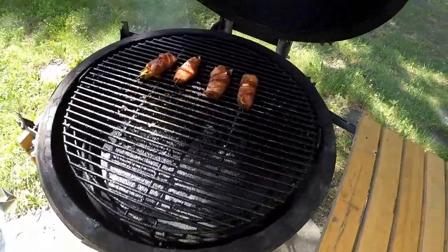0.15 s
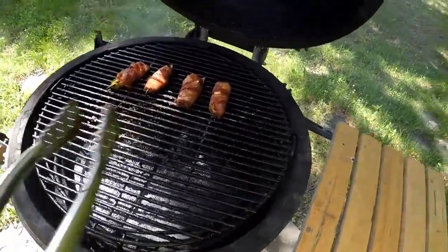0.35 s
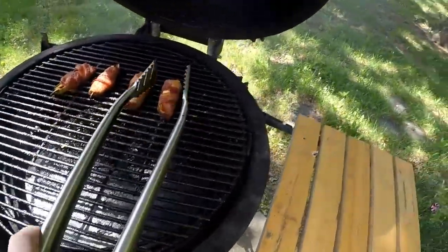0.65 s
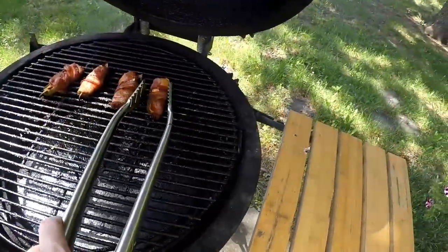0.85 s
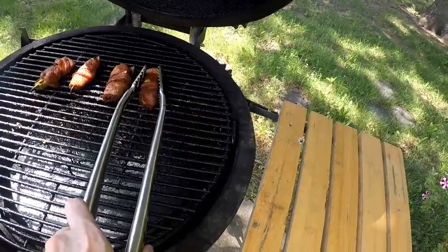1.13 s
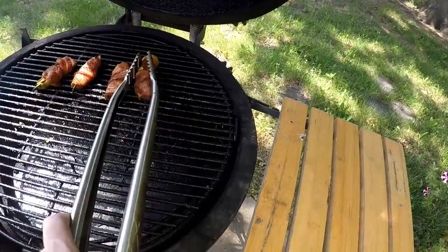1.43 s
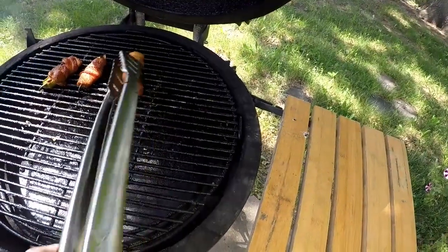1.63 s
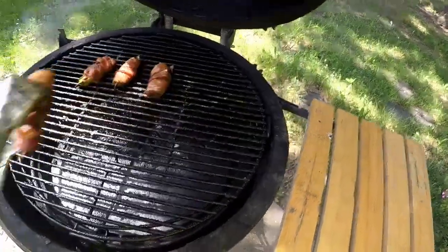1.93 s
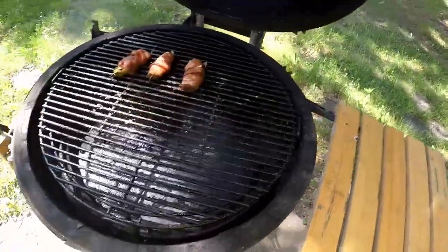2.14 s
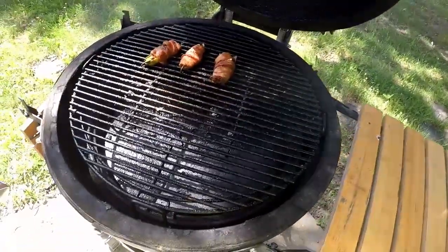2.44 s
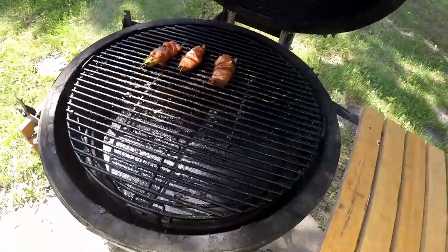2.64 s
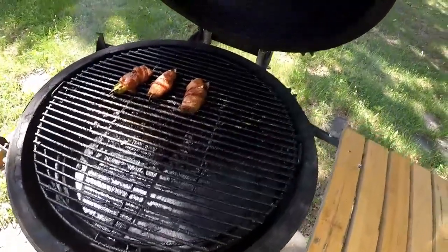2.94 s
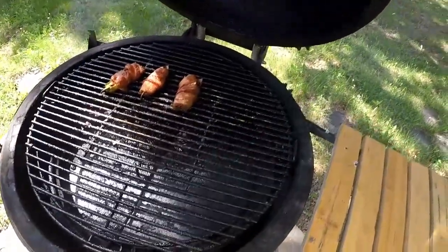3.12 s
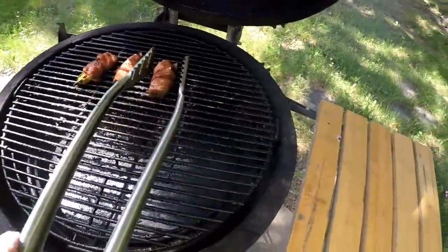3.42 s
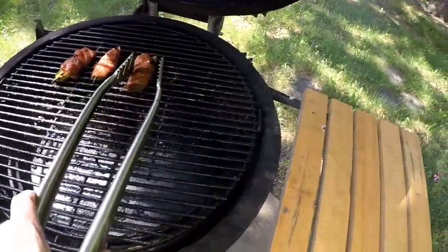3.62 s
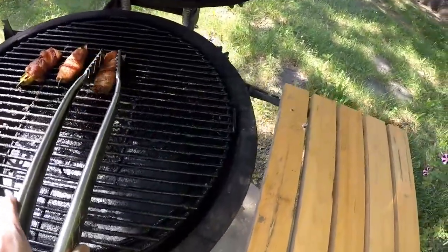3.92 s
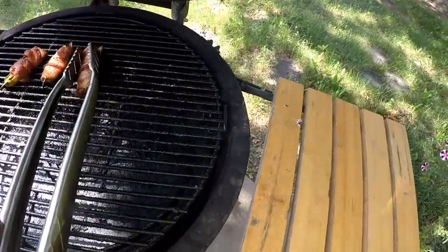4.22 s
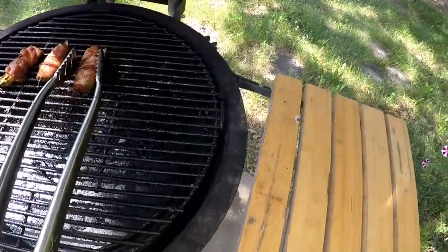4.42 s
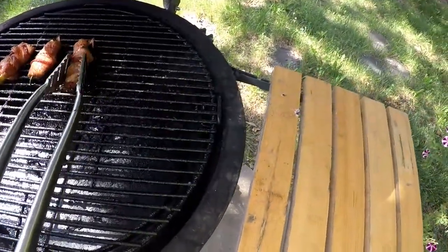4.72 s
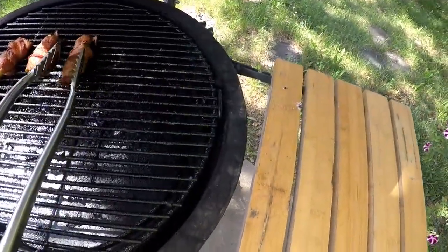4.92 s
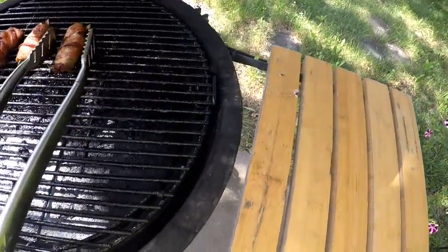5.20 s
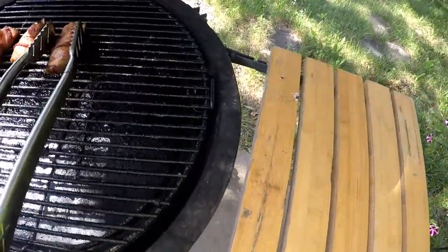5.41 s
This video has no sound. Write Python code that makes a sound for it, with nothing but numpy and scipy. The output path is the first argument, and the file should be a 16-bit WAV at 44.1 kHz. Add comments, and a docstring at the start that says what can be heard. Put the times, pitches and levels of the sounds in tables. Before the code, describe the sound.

Steel tongs click, squeak and scrape on a metal grill grate in short bursts, over a low unsteady hum, light wind and faint hiss outdoors.

```python
"""A garden, at a kettle grill: steel tongs lift food off the grate, close to a small camera.
Noise shaped into knocks and scrapes rasps at the tips and rings the arms and bars; locked slides squeak.
The grate bounces as a wavering low tone with a thud. The camera's case ticks in short pings, and its mount
creaks in bands of noise. A distant machine hums in unsteady tones, over steady air noise, a fine hiss
and the low rumble of light wind on the microphone."""
import sys
import numpy as np
from scipy import signal
from scipy.fft import rfft, irfft
from scipy.io import wavfile
from scipy.ndimage import uniform_filter1d

SR = 44100
rng = np.random.default_rng(int(sys.argv[2]) if len(sys.argv) > 2 else 0)


def generate_wav(sig):
    """Save sig (samples, or channels by samples) to the path in sys.argv[1] as 16-bit PCM at SR."""
    pcm = np.round(np.clip(np.atleast_2d(sig).T, -1, 1) * 32767).astype(np.int16)
    wavfile.write(sys.argv[1], SR, pcm)


N = 245195
TIME = np.arange(N) / SR  # s
RISE_SHARE = 0.202  # a knock builds up for this share of its decay time
BOUNCE_RISE_S = 0.019
EDGE_HZ = 15300  # upper band limit

# Levels are in dB; tongs, squeaks, grate, bounce and wind add a trim.
# Tips striking: t/s, level/dB, decay/s, share passed to the grate/dB
TIP_KNOCKS = [(0.883, -17.5, 0.0086, 2), (0.8926, -32.5, 0.0081, 14), (0.9427, -22, 0.0032, 6.5),
              (0.948, -23, 0.0038, -2), (1.027, -29, 0.009, -18), (2.5655, -26, 0.0036, -12),
              (2.572, -24, .003, -12), (2.578, -29, 0.005, -18), (2.6415, -24, 0.003, -21),
              (2.6646, -16.5, 0.0065, -18), (2.673, -22, .003, -15), (2.6825, -27, 0.002, -12),
              (2.708, -22, 0.0016, -11), (2.7205, -24.5, 0.0042, -17), (2.7265, -21, 0.0015, -24),
              (3.5575, -27, 0.0018, -4), (3.563, -27, 0.015, -2), (3.622, -38, 0.0021, -2),
              (3.7457, -28.5, 0.005, -6), (3.777, -30.5, 0.0088, 0), (3.805, -28, 0.0024, -3),
              (4.3168, -27.5, 0.0038, 2.5), (4.449, -28, 0.0021, -8), (4.4745, -29, 0.0027, -8),
              (4.51, -31, 0.0023, -7), (4.549, -28.5, .005, -9), (4.815, -33, 0.0015, -14),
              (5.047, -28, 0.0018, -16), (5.0737, -32, 0.0053, -6), (5.128, -30, 0.0058, 1),
              (5.153, -26, 0.0036, -4), (5.1912, -30, 0.0039, 7), (5.2235, -30, 0.0038, 3),
              (5.332, -26, .003, -4), (5.343, -24, 0.0017, 0.5), (5.353, -38, 0.0029, 11),
              (5.402, -36, .003, -4), (5.429, -32, .003, 4)]
# Tips sliding: middle t/s, level/dB, half length/s, share passed to the grate/dB
TIP_SCRAPES = [(0.954, -43, 0.044, 10.5), (1.005, -34.5, 0.019, 1.5), (1.063, -42.5, 0.025, 1),
               (2.592, -20.5, 0.015, -9), (2.683, -33.5, 0.05, -3.5), (2.806, -37, 0.023, -2),
               (3.645, -43.5, 0.025, 1.5), (3.833, -39, 0.055, 1), (3.865, -25, 0.0064, -4),
               (4.094, -46.5, 0.068, -2), (4.347, -39.5, 0.032, -1), (4.38, -49, .008, 8),
               (4.466, -35, 0.034, 1.5), (4.516, -46, .01, 4), (4.558, -38.5, 0.045, -1),
               (4.862, -43, 0.042, -4), (5.083, -31, 0.017, -2), (5.156, -28, 0.0091, -0.5),
               (5.218, -34.5, 0.025, 1), (5.33, -29, 0.019, -2), (5.414, -32.5, 0.032, -1),
               (5.512, -41, 0.031, 0)]
# Steel squeaking: middle t/s, level/dB, half length/s, f/Hz
STEEL_SQUEAKS = [(0.887, -29, 0.0032, 7040), (0.887, -31, 0.0047, 11150), (0.888, -37, 0.0037, 4500),
                 (0.947, -40, 0.0033, 4500), (1.039, -45, .005, 4500), (2.583, -22.5, 0.013, 7240),
                 (2.667, -21, .002, 9400), (2.668, -35, 0.0034, 5320), (3.648, -42, .01, 9600),
                 (3.795, -49, 0.012, 3580), (3.868, -31, .005, 5800), (4.047, -36, 0.0083, 7700),
                 (4.324, -30.5, 0.004, 9600), (4.375, -43, 0.007, 3970), (4.461, -21, 0.0033, 7440),
                 (4.52, -45, .009, 3900), (4.543, -36, 0.024, 7520), (4.879, -38, 0.0079, 7550),
                 (5.076, -23, 0.0046, 7400), (5.161, -27.5, 0.0036, 6360), (5.2, -38, .009, 6600),
                 (5.222, -47, .005, 3000), (5.228, -44, .009, 2170), (5.335, -33, .007, 10720),
                 (5.336, -49, 0.0065, 3870), (5.339, -26, 0.0072, 6450), (5.42, -35, 0.0075, 7550),
                 (5.439, -39, .005, 1850), (5.44, -45, .006, 3970), (5.443, -34, 0.015, 6440)]
# Colour of steel on steel at the tips: f/Hz, level/dB
TIP_COLOUR = [(400, -62), (1500, -16), (3000, -17), (4800, -13.5), (5300, -8), (5900, -3.5), (6600, -0.5),
              (7400, 5), (8200, -1), (9900, -1), (11300, -12), (14000, -17), (15500, -51)]
# Modes of the tongs' arms: f/Hz, level/dB, t60/s
ARM_MODES = [(4550, -7, 0.055), (5280, -17, 0.026), (5940, 0, 0.025), (6500, 11, 0.071), (6480, 14, 0.051),
             (6950, 10, 0.054), (6900, 1, 0.044), (7400, 14, 0.039), (7470, 9, 0.045), (7650, 6, 0.055),
             (8530, 5, .04), (9150, 3, 0.025), (9960, 9, 0.037), (10700, 2, .05)]
# Modes of the grate's bars: f/Hz, level/dB, t60/s
BAR_MODES = [(340, 0, 0.054), (399, 3.5, 0.15), (735, 0, 0.22), (871, 1, 0.1), (985, -3, 0.069),
             (1184, -9, 0.19), (1312, 7, 0.14), (1433, 3, 0.086), (1620, -3, 0.07), (1864, 5.5, 0.12),
             (2138, 6, 0.073), (2374, 7, 0.039), (2776, -3, 0.094), (2995, -4, 0.048), (3220, -7, 0.055),
             (3460, -5, .045), (3600, 3.5, 0.037), (3900, 5, 0.04), (4100, -14, 0.02), (4450, -14, 0.03)]
# Dense clatter of the whole grate: f/Hz, level/dB
CLATTER_COLOUR = [(150, -62), (330, 1), (550, -5), (1000, -1.5), (1500, 4.5), (2200, 4), (2700, -6),
                  (3400, -1.5), (4200, -5), (4900, -19), (9000, -39)]
# Grate bouncing on its seat: t/s, level/dB, decay/s
GRATE_BOUNCES = [(0.91, -20, 0.068), (4.35, -24.5, 0.084), (4.488, -20.5, 0.036), (5.119, -24, 0.072),
                 (5.33, -25, 0.078)]
# Camera's case ticking: t/s, level/dB, knock f/Hz, then knock, panel, shell and snap level/dB
CASE_TICKS = [(2.996, -31.5, 1600, -5, 0, -1, 2), (3.0066, -27, 1600, -5, -6, -3, -6),
              (3.0263, -17.5, 1590, 0, -0.5, -0.5, -7), (3.0308, -17.5, 1570, -3.5, -4, -2, -5),
              (3.035, -28, 1600, 0, -3, 0, -2), (3.2636, -29.5, 1950, 0, 0, -1, 6),
              (3.2659, -35, 1950, -4, -2, 1, 10), (3.3515, -20.5, 1950, -2.5, 4.5, -3, 2.5)]
# Camera's mount rubbing and bumping: middle t/s, level/dB, half length/s, f/Hz, width/Hz,
# pan/dB (added left, taken off right)
MOUNT_RUBS = [(3.122, -30.5, 0.0064, 147, 124, 12.5), (3.567, -29.5, 0.0025, 1420, 450, -4),
              (3.574, -38.5, 0.0071, 2380, 2600, -1), (3.5755, -32.5, 0.0033, 1230, 380, -6.5),
              (3.577, -41, 0.017, 596, 600, -5), (3.585, -30.5, 0.0058, 362, 218, -1),
              (3.586, -39, .003, 2200, 600, -1), (3.594, -35.5, 0.0033, 496, 300, -2),
              (3.595, -43, 0.0034, 2300, 1800, -4), (3.644, -33.5, 0.0062, 360, 120, 0)]
# Wavering tones of the distant machine: f/Hz, level/dB, pan/dB (added left, taken off right)
HUM_TONES = [(99.26, -36, 1.5), (120.45, -36, -0.5), (176.5, -47.5, 3), (233.2, -42, 0.5),
             (240.2, -40.5, 0.5), (357, -50.5, -3.5), (405.6, -54.5, -4.5), (758.5, -57.5, 5),
             (1003, -65, 8.5), (1043, -67, 7), (1046, -65, 14)]
# Murmur of air and far traffic: f/Hz, level/dB per Hz
AIR_COLOUR = [(20, -46.5), (80, -50.5), (120, -50), (150, -55), (215, -55.5), (255, -70), (285, -60.5),
              (310, -63.5), (390, -66), (550, -70), (1000, -73.5), (1800, -77.5), (2700, -88), (6000, -115)]
# Fine hiss above the murmur: f/Hz, level/dB per Hz
HISS_COLOUR = [(1500, -105), (3300, -88.5), (4600, -94), (6000, -82.5), (7500, -78.5), (8100, -83.5),
               (10100, -84), (11300, -95.5), (13400, -101), (14600, -114)]
# Left-right likeness of air and hiss: f/Hz, likeness/0-1
AIR_LIKENESS = [(30, 0.32), (70, 1), (150, 0.72), (290, 1), (640, 0.28), (1300, 0.4), (2200, 0.4),
                (3200, 0.85), (7000, 0.52), (15000, 0)]
# Wind on the microphone: f/Hz, level/dB
WIND_COLOUR = [(5, -12), (12, 6), (30, 16.5), (55, 8.5), (90, -9), (160, -16.5), (400, -77), (1500, -82)]
# Strength of the breeze: t/s, level/dB
BREEZE_LEVEL = [(0.0, -30), (0.06, -23), (1.08, -29), (1.27, -38.5), (1.95, -29), (2.76, -27), (2.9, -16.5),
                (3.47, -25), (5.23, -29.5), (5.31, -25.5), (5.53, -23), (5.56, -34)]
# Response of the right port: f/Hz, level/dB
RIGHT_PORT_COLOUR = [(30, -2), (300, -0.5), (5200, -0.5), (6000, -8.5), (7000, -13), (8500, -10),
                     (10200, -12.5), (14000, -7)]
# Lag of the right port behind the left: f/Hz, phase/rad
RIGHT_PORT_LAG = [(300, 0), (700, .5), (1400, 1.68), (2200, 2), (3200, 0.88), (5700, 0), (7300, -2.5),
                  (9000, -2), (15000, -2.5)]


def tongs(strength, rasp_db=-1.0, ring_db=-6):
    """The tips rasp directly and set the arms ringing."""
    friction = flecks(pair(0.6), depth_db=3, count=9, size=2)
    force = friction * slips(grain_db=-2.0, rate_hz=120)
    rasp = colour(force * strength, TIP_COLOUR) / np.std(colour(force[0], TIP_COLOUR))
    arms = ring(rng.standard_normal(N) * strength, ARM_MODES, spread=0.65)
    return amp(rasp_db) * rasp + amp(ring_db) * arms


def contact():
    """Strength of the rubbing over time, at the tips and as passed into the grate: powers add."""
    grit = catches()
    tip_power, grate_power = np.zeros(N), np.zeros(N)
    for s, db, decay, grate_db in TIP_KNOCKS:
        strength = amp(db) * blow(TIME - s, RISE_SHARE * decay, decay)
        tip_power += strength ** 2
        grate_power += (strength * amp(grate_db)) ** 2
    for s, db, half, grate_db in TIP_SCRAPES:
        strength = amp(db) * grit * stroke(TIME - s, half)
        tip_power += strength ** 2
        grate_power += (strength * amp(grate_db)) ** 2
    return np.sqrt(tip_power), np.sqrt(grate_power)


def blow(t, rise, decay):
    """Strength after a blow: a straight rise, then dying away."""
    age = np.maximum(t, 0)
    return np.minimum(age / rise, 1) * np.exp(-np.clip((age - rise) / decay, 0, 20))


def stroke(t, half):
    """Pressure swelling and easing during one slide."""
    return np.exp(-np.minimum((t / half) ** 2 / 2, 20))


def catches(per_s=100, catch_db=10, decay_s=0.0017):
    """The tips catch on burnt crust at random moments: tiny ticks within a slide, of mean power 1."""
    kicks = (rng.random(N) < per_s / SR) * rng.uniform(0.14, 1, N)
    dying = signal.lfilter([1], [1, -np.exp(-1 / (decay_s * SR))], kicks)
    power = 1 + amp(catch_db) ** 2 * dying
    return unit(np.sqrt(power))


def slips(grain_db, rate_hz, size=200):
    """Stick and slip break the rubbing into grains; the power averaged over size samples stays level."""
    grains = amp(grain_db * drift(rate_hz))
    return grains / np.sqrt(uniform_filter1d(grains ** 2, size))


def flecks(x, depth_db, count, size):
    """As the contact moves, energy rings out in changing spectral patches, count frames by size bins."""
    z = signal.stft(x, nperseg=512, noverlap=384)[2]
    patches = uniform_filter1d(rng.standard_normal(z.shape[1:]), size=count, axis=1)
    patches = unit(uniform_filter1d(patches, size=size, axis=0))
    gain = amp(depth_db * np.clip(patches, -2, 2))
    gain /= np.sqrt(uniform_filter1d(gain ** 2, size=11, axis=0))  # evens out the local energy
    return signal.istft(z * gain, nperseg=512, noverlap=384)[1][:, :N]


def squeaks(level_db=-2, wander_hz=70, flutter_db=3, slide_hz=7480, slide_db=-11):
    """Friction locks onto one mode of the steel, which sings unsteadily: loud squeaks, fainter slides."""
    out = np.zeros(N)
    wander = wander_hz * drift(246)
    flutter = unit(amp(flutter_db * drift(200)))
    slides = [(s, db + slide_db, half, slide_hz) for s, db, half, _ in TIP_SCRAPES]
    for s, db, half, hz in STEEL_SQUEAKS + slides:
        near = abs(TIME - s) < 4 * half
        phase = 2 * np.pi * np.cumsum(hz + wander[near]) / SR
        tone = unit(flutter[near] * np.sin(phase))
        out[near] += amp(db) * stroke(TIME[near] - s, half) * tone
    return amp(level_db) * out


def grate(strength, bars_db=-10.0, blow_db=26.5, push_hz=1500, clatter_db=-9.5, clatter_t60=0.092):
    """Rubbing rings all the bars' modes, a blow shoves mainly the low ones, over a short dense clatter."""
    blows = np.zeros(N)
    for s, db, decay, grate_db in TIP_KNOCKS:
        peak = round((s + RISE_SHARE * decay) * SR)
        blows[peak] = amp(blow_db + db + grate_db)
    push = signal.sosfilt(signal.butter(3, push_hz, fs=SR, output="sos"), blows)
    bars = ring(strength * rng.standard_normal(N) + push, BAR_MODES, spread=0.9)
    hold = amp(-120 / (clatter_t60 * SR))  # power kept per sample: 60 dB lost in clatter_t60 seconds
    lingering = np.sqrt(signal.lfilter([1 - hold], [1, -hold], strength ** 2))
    jangle = flecks(pair(1.0), depth_db=5, count=10, size=2)
    clatter = lingering * unit(colour(jangle, CLATTER_COLOUR))
    return amp(bars_db) * bars + amp(clatter_db) * clatter


def bounce(hz=286, wander_hz=7, level_db=-2, thud_db=-10, thud_hz=280, thud_width_hz=100):
    """A shove swings the grate's lowest mode, unsettled by the tongs' load; its seat thuds dully."""
    phase = 2 * np.pi * np.cumsum(hz + wander_hz * drift(26.4)) / SR
    swing = sum(amp(db) * blow(TIME - s, BOUNCE_RISE_S, decay) for s, db, decay in GRATE_BOUNCES)
    thud = resonate(rng.standard_normal(N), thud_hz, thud_width_hz)
    thud = unit(resonate(thud, thud_hz, thud_width_hz))
    return swing * amp(level_db) * (np.sin(phase) + amp(thud_db) * thud)


def ticks(knock_s=0.00043, knock_pan_db=-3, panel_hz=3500, panel_s=0.00025,
          shell_hz=5400, shell_s=0.00027, snap_hz=7450, snap_s=0.00037,
          edge_hz=9900, edge_s=0.00015, rattle_db=-20, hollow_hz=2650, hollow_width_hz=600):
    """The plastic case rings briefly: hollow knock, panel, shell, bright snap and a faint rattle."""
    out = np.zeros((2, N))
    t = TIME[:SR // 20]

    def ping(hz, peak_s):
        """A resonance that swells until peak_s and dies at once."""
        return t / peak_s * np.exp(1 - t / peak_s) * np.sin(2 * np.pi * hz * t)

    snap = ping(snap_hz, snap_s) - ping(edge_hz, edge_s)
    settling = np.exp(-t / 0.007)
    for s, db, knock_hz, knock_db, panel_db, shell_db, snap_db in CASE_TICKS:
        knock_gain = amp([[knock_db + knock_pan_db], [knock_db - knock_pan_db]])
        knock = knock_gain * ping(knock_hz, knock_s)
        body = amp(panel_db) * ping(panel_hz, panel_s) + amp(shell_db) * ping(shell_hz, shell_s)
        rattle = unit(resonate(rng.standard_normal((2, len(t))), shell_hz, 4000)) * settling
        # the knock is subtracted; the notch below hollows the sound between knock and panel
        tick = body - knock + amp(snap_db) * snap + amp(rattle_db) * rattle
        out[:, round(s * SR):][:, :len(t)] += amp(db) * tick
    return signal.lfilter(*signal.iirnotch(hollow_hz, hollow_hz / hollow_width_hz, SR), out)


def rubs():
    """Short dull creaks and bumps carried through the camera's mount: swelling bands of noise."""
    out = np.zeros((2, N))
    for s, db, half, hz, width_hz, pan_db in MOUNT_RUBS:
        near = abs(TIME - s) < 0.1
        edges = [max(hz - width_hz / 2, 20), hz + width_hz / 2]
        band = signal.butter(3, edges, "bandpass", fs=SR, output="sos")
        noise = signal.sosfilt(band, rng.standard_normal(near.sum()))
        swell = stroke(TIME[near] - s, half)
        creak = unit(noise * swell) * np.sqrt(np.mean(swell ** 2))
        out[:, near] += amp([[db + pan_db], [db - pan_db]]) * creak
    return out


def hum(waver=0.1013, flutter_db=2.0):
    """Motor and fan tones, each wavering in pitch and level on its way through the air."""
    out = np.zeros((2, N))
    for hz, db, pan_db in HUM_TONES:
        phase = 2 * np.pi * np.cumsum(hz + waver * np.sqrt(hz) * drift(6.0)) / SR
        tone = unit(np.sin(phase) * amp(flutter_db * drift(3.7)))
        out += amp([[db + pan_db], [db - pan_db]]) * tone
    return out


def outdoors(swell_db=0.87, fizz_db=0.6, wind_db=1, wind_pan_db=0.75):
    """Gently swelling air and fizzing hiss, and a breeze of low noise that buffets the two ports."""
    likeness = read(AIR_LIKENESS, np.fft.rfftfreq(N, 1 / SR))
    air = colour(pair(likeness), AIR_COLOUR) * amp(swell_db * drift(12.0))
    hiss = colour(pair(likeness), HISS_COLOUR) * amp(fizz_db * drift(200))
    breeze_db = np.interp(TIME, *np.transpose(BREEZE_LEVEL))
    wind = unit(colour(pair(0.3), WIND_COLOUR)) * amp(wind_db + breeze_db)
    per_hz = np.sqrt(SR / 2)  # white noise of rms 1 spreads over SR / 2
    return per_hz * (air + hiss) + wind * amp([[wind_pan_db], [-wind_pan_db]])


def ring(force, modes, spread):
    """Decaying modes of total energy 1; each reaches the right port with its own phase."""
    t = TIME[:SR // 3]
    body = 0
    for hz, db, t60 in modes:
        lag = np.array([[0], [spread * rng.uniform(-1, 1)]])
        body = body + amp(db) * unit(amp(-60 * t / t60) * np.sin(2 * np.pi * hz * t + lag))
    return signal.oaconvolve(force[None], body / np.linalg.norm(body[0]), axes=1)[:, :N]


def resonate(x, hz, width_hz):
    """One resonance of gain 1."""
    return signal.lfilter(*signal.iirpeak(hz, hz / width_hz, SR), x)


def pair(likeness):
    """White noise at two ports, alike by the given share."""
    left, other = rng.standard_normal((2, N))
    c = np.clip(likeness, -1, 1)
    right = irfft(c * rfft(left) + np.sqrt(1 - c ** 2) * rfft(other), N)
    return np.array([left, right])


def drift(rate_hz):
    """Slow random motion of rms 1, drawn on a coarse time grid."""
    t = np.linspace(0, TIME[-1], 1024 if rate_hz < 20 else 32768)
    lowpass = np.exp(-(np.fft.rfftfreq(len(t), t[1]) / rate_hz) ** 2)
    smooth = irfft(rfft(rng.standard_normal(len(t))) * lowpass)
    return np.interp(TIME, t, unit(smooth))


def colour(x, points):
    """Filters by a table of f/Hz, level/dB."""
    size = x.shape[-1]
    return irfft(rfft(x) * amp(read(points, np.fft.rfftfreq(size, 1 / SR))), size)


def read(points, hz):
    """Reads a table on a log-frequency axis."""
    f, value = np.transpose(points)
    return np.interp(np.log(hz + 1), np.log(f + 1), value)


def unit(x):
    """Scales to rms 1."""
    return x / np.sqrt(np.mean(x ** 2) + 1e-20)


def amp(db):
    """Decibels to gain."""
    return 10 ** (np.asarray(db) / 20)


def scene():
    """Tongs and grate, then the camera's own noises, over the garden background."""
    at_tips, at_grate = contact()
    grill = tongs(at_tips) + squeaks() + grate(at_grate) + bounce()
    camera = ticks() + rubs()
    return grill + camera + hum() + outdoors()


def record(dry):
    """The right port is duller and shifted in phase; then the band limit."""
    lag = read(RIGHT_PORT_LAG, np.fft.rfftfreq(N, 1 / SR))
    right = irfft(rfft(colour(dry[1], RIGHT_PORT_COLOUR)) * np.exp(-1j * lag), N)
    lowpass = signal.firwin(511, EDGE_HZ, window=("kaiser", 9), fs=SR)
    return signal.oaconvolve(np.array([dry[0], right]), lowpass[None], "same")


dry = scene()
out = record(dry)
generate_wav(out)
```